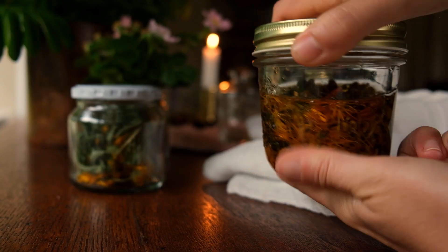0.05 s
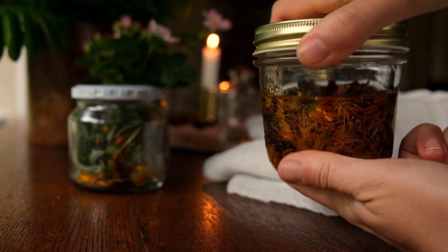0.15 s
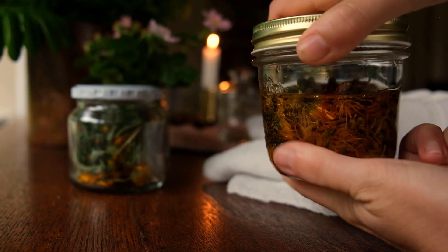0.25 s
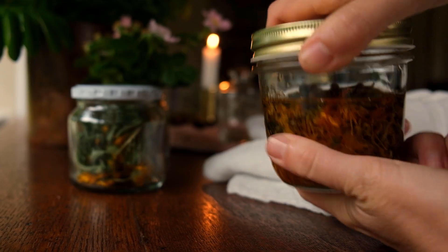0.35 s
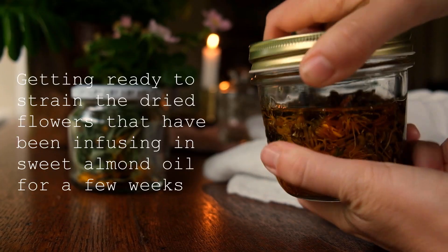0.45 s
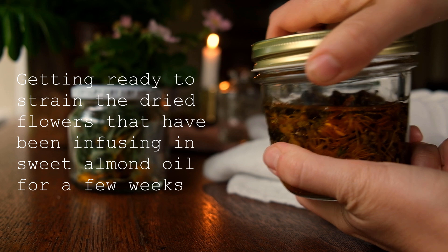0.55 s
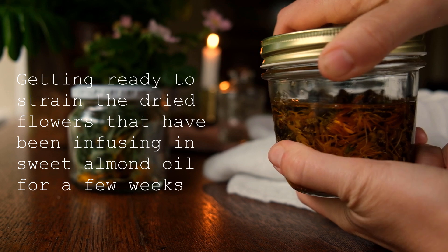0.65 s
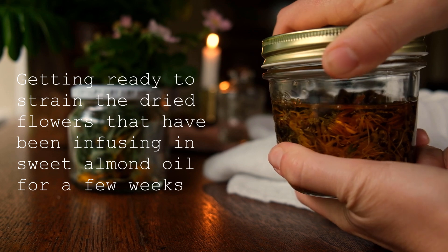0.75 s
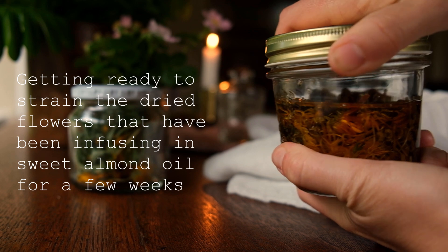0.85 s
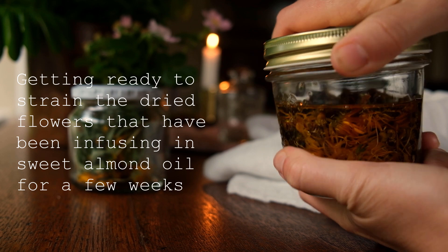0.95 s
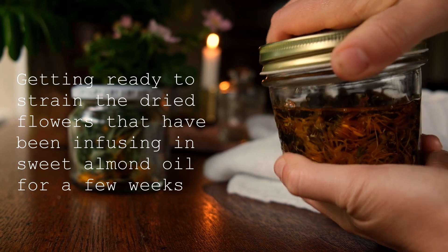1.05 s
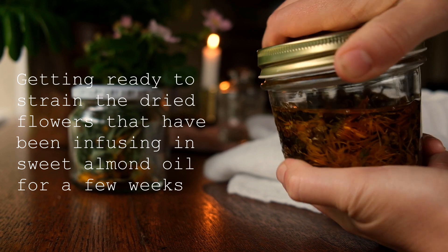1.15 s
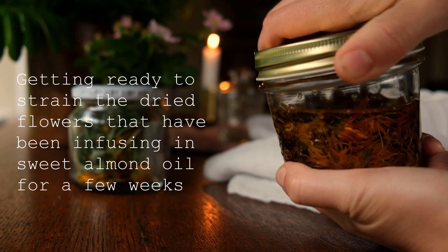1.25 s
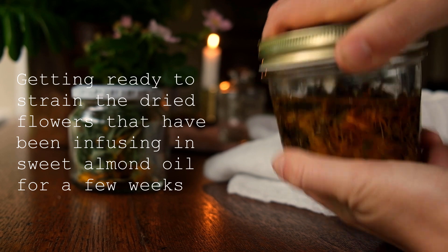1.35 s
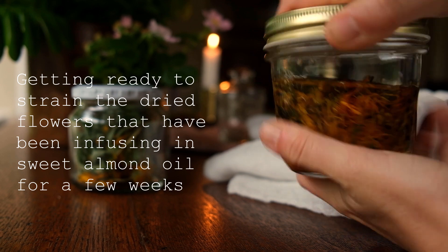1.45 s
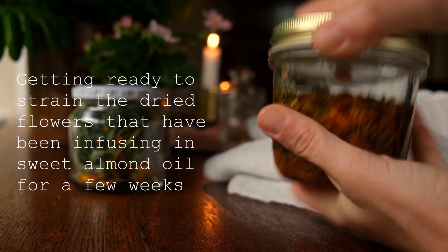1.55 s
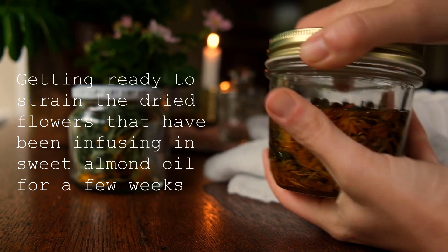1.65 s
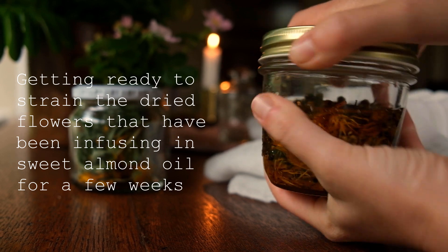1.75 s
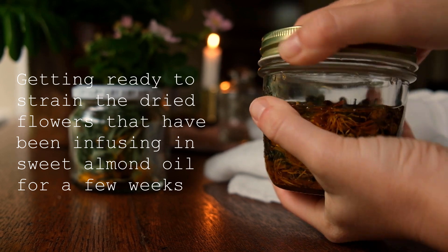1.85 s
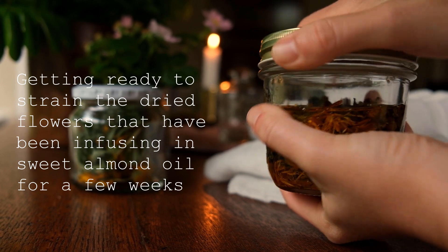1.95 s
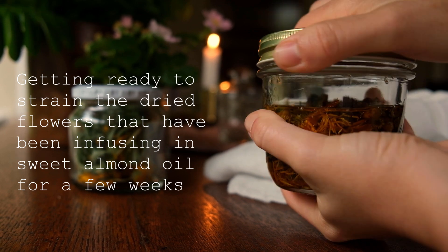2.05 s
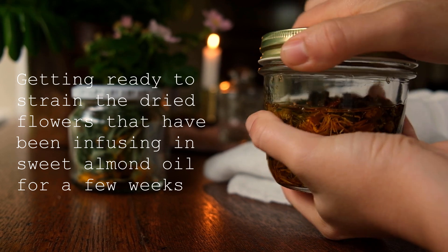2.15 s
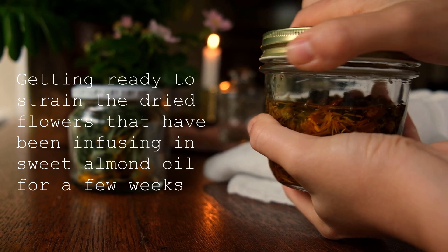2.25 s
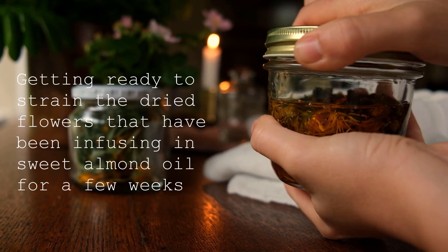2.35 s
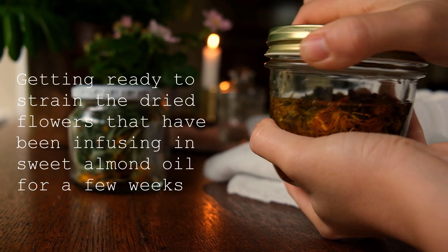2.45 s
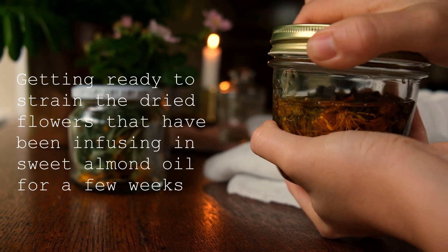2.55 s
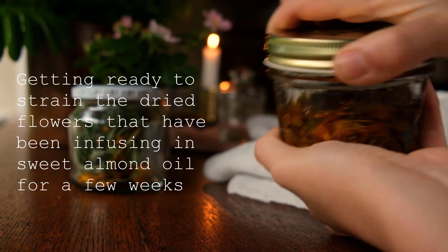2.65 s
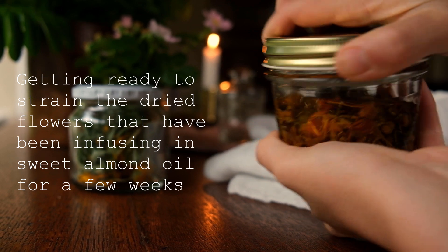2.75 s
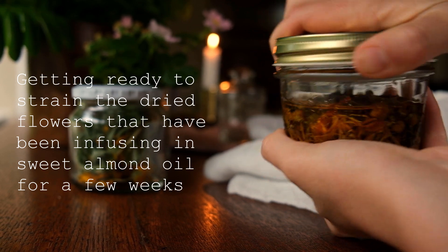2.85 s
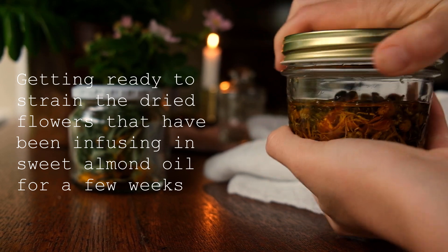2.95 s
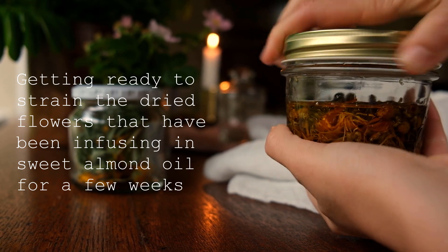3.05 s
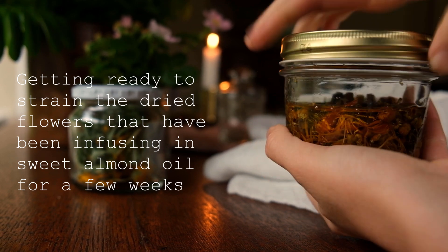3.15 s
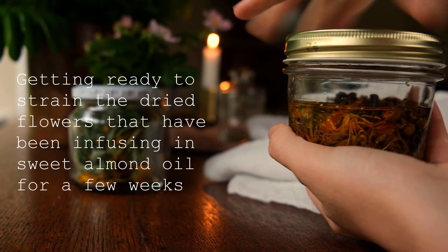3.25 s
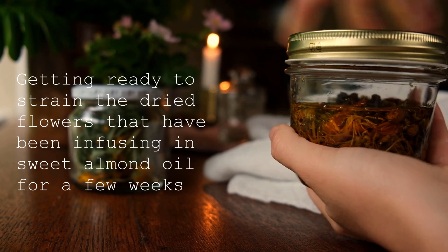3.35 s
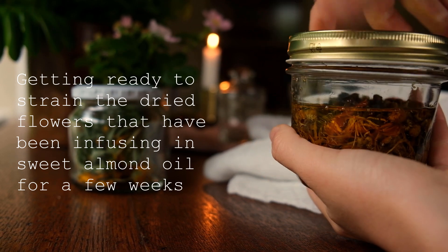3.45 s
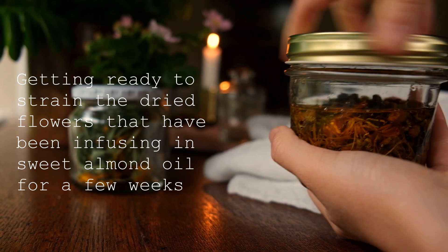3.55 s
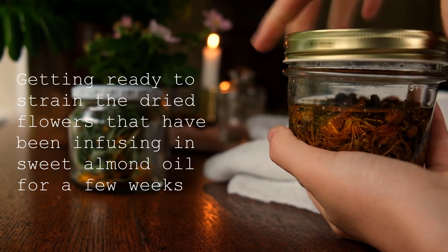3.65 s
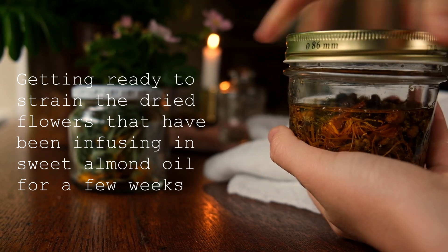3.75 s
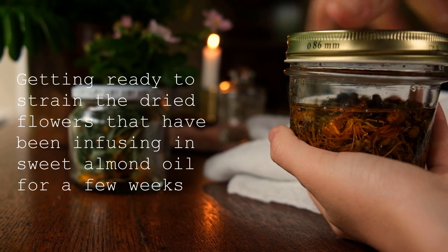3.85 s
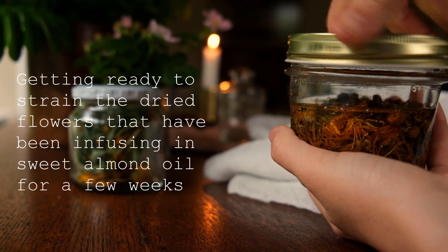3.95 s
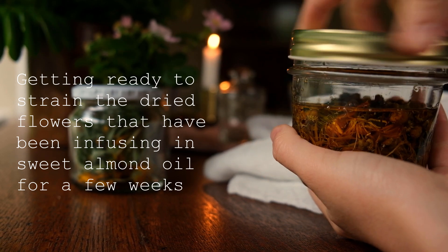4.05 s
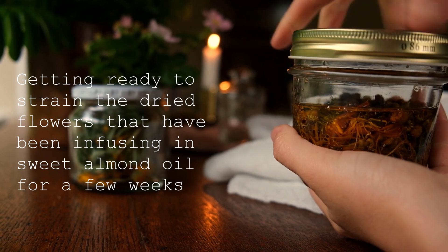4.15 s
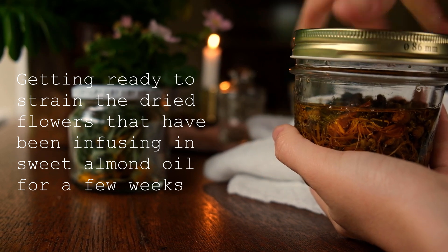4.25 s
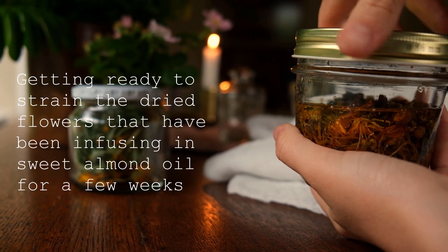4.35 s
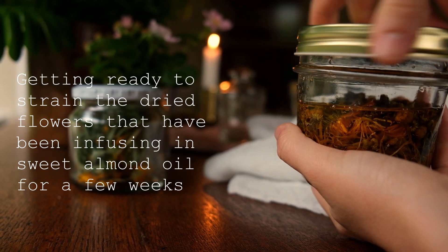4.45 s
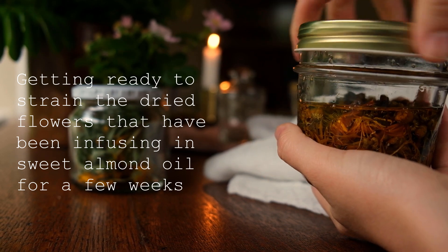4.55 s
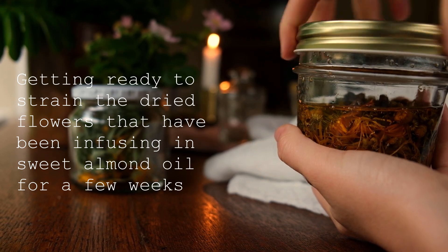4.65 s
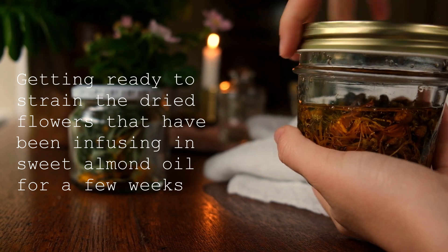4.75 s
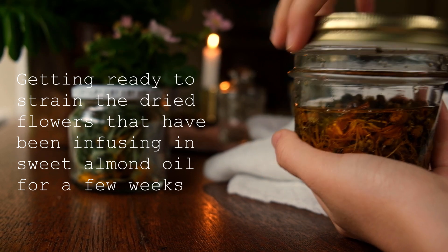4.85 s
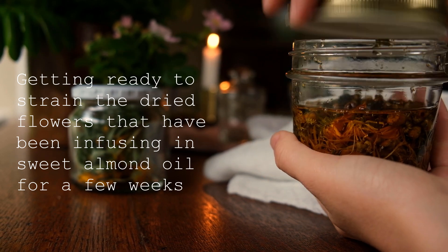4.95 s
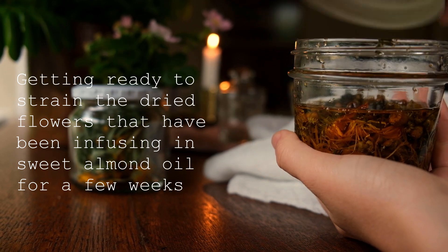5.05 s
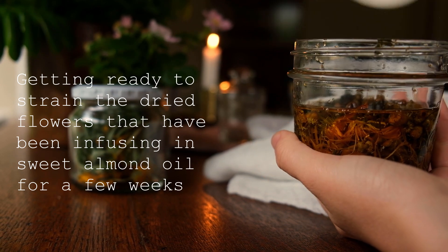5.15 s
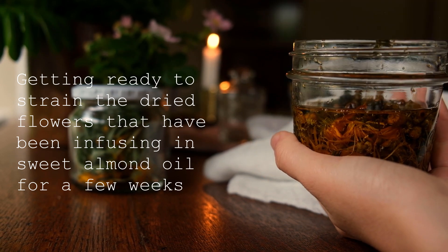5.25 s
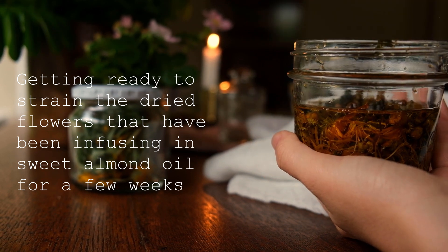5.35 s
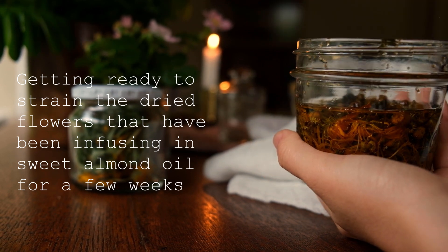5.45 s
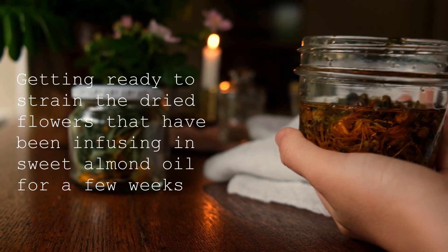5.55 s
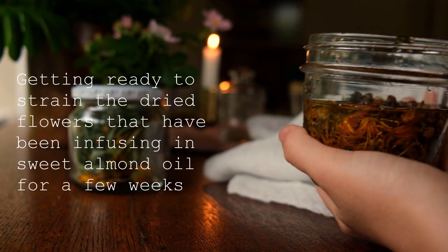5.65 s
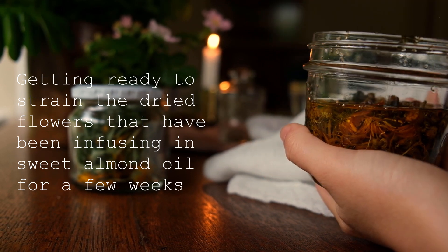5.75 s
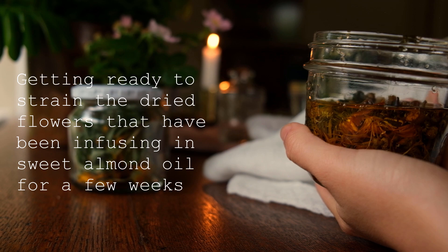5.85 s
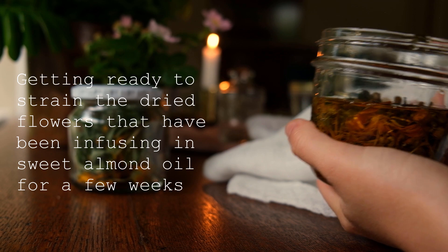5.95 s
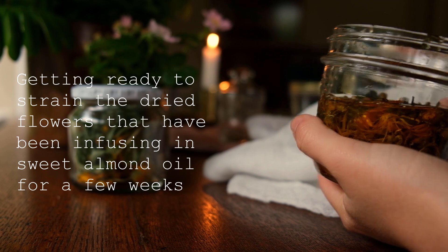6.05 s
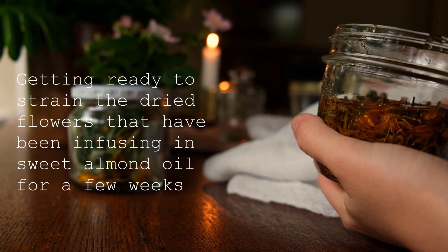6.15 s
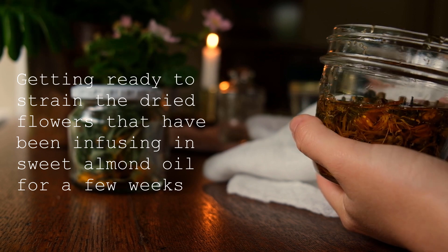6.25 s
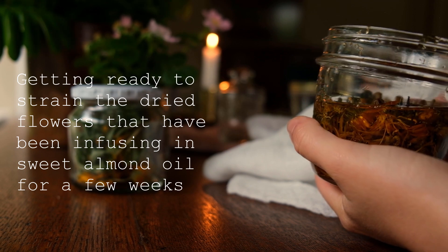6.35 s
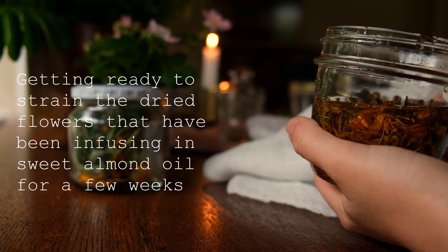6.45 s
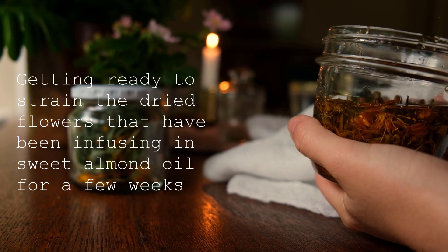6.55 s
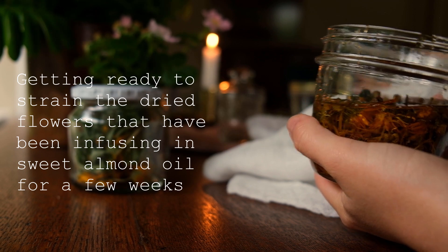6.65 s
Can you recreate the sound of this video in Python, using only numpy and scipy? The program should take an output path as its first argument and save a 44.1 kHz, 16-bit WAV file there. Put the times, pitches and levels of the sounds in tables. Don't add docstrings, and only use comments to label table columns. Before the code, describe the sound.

In a quiet room with a faint appliance hum, a soft thud is followed by low skin judder and tiny ticks as hands strain at a jar lid. The seal creaks and cracks free sharply, then short gritty metal-on-glass turns ring and click. The lid comes off with a light clink and later knocks and skids on wood. Faint birds outside; close stereo microphone.

```python
import sys
import numpy as np
from scipy import signal
from scipy.fft import rfft, irfft, next_fast_len
from scipy.io import wavfile
from scipy.ndimage import uniform_filter1d

SR = 44100
rng = np.random.default_rng(int(sys.argv[2]) if len(sys.argv) > 2 else 0)


def wav_out(sig):
    wavfile.write(sys.argv[1], SR, np.round(np.clip(np.atleast_2d(sig).T, -1, 1) * 32767).astype(np.int16))


def gain_from_db(level_db):
    decades = np.asarray(level_db, float) / 20
    return 10 ** decades


N = 295911


def rms_one(x):
    return x / np.sqrt(np.mean(x ** 2) + 1e-20)


def drift(rate_hz):
    r = np.exp(-80 * np.pi * rate_hz / SR)
    white = rng.standard_normal(N // 40 + 2002)
    slow = signal.lfilter([1], [1, -2 * r, r * r], white)[2000:]
    return np.interp(np.arange(N) / 40, np.arange(len(slow)), rms_one(slow))


def band(x, low_hz, high_hz, order=2):
    return signal.sosfilt(signal.butter(order, [low_hz, high_hz], "band", fs=SR, output="sos"), x)


def grains(per_s, spread_db):
    sizes = gain_from_db(spread_db * np.minimum(rng.exponential(1, N), 4))
    return rms_one(sizes * (rng.random(N) < per_s / SR))


def swells(rows, bend, slower=1):
    rows = np.array(rows)[:, :, None]
    late_ms = (np.arange(N) / SR - rows[:, 0]) * 1000
    part = np.where(late_ms < 0, -late_ms / rows[:, 2], late_ms / rows[:, 3]) / slower
    power = gain_from_db(2 * rows[:, 1] - 40 * np.minimum(part, 9) ** bend)
    total = power.sum(0)
    return np.sqrt(total), (power * rows[:, -1]).sum(0) / total


def bursts(times_s, peaks_db, lengths_ms, sharp):
    touch, rattle = np.zeros(N), np.zeros(N)
    for s, peak_db, ms in zip(times_s, peaks_db, lengths_ms):
        at = round(s * SR)
        fade = np.exp(-np.arange(2000) / (max(ms, .2) * SR / 1000))
        touch[at] += sharp * gain_from_db(peak_db)
        rattle[at:at + 2000] += gain_from_db(peak_db) * fade / np.sqrt(np.sum(fade ** 2))
    return touch, rattle


def body(modes, rub, touch, rattle, wander_db):
    hz, level_db, t60_s = np.transpose(modes)
    gain = gain_from_db(level_db)
    r = gain_from_db(-60 / (np.clip(t60_s, .005, .4) * SR))
    per_rub = gain / np.sqrt(np.sum(gain ** 2 / (2 - 2 * r ** 2)))
    per_blow = gain / np.sqrt(np.sum(gain ** 2))
    out, white = 0, rng.standard_normal(N)
    for k, w in enumerate(2 * np.pi * hz / SR):
        noise = np.roll(white, 9973 * k)
        blow = per_blow[k] * (touch + rattle * noise)
        rubbing = per_rub[k] * rub * gain_from_db(wander_db * drift(9.0)) * noise
        ring = [1, -2 * r[k] * np.cos(w), r[k] ** 2]
        out = out + (-1) ** k * signal.lfilter([0, np.sin(w)], ring, blow + rubbing + 1e-18)
    return out


def moving_band(hz, width_hz, force):
    pair = rng.standard_normal(N) + 1j * rng.standard_normal(N)
    r = np.exp(-np.pi * width_hz / SR)
    slow = signal.lfilter([np.sqrt(1 - r * r)], [1, -r], force * pair)
    return np.real(slow * np.exp(2j * np.pi * np.cumsum(hz * np.ones(N)) / SR))


def coloured(spectrum, alike_at, patchy_db):
    spectrum, alike_at = np.array(spectrum), np.array(alike_at)
    edges_hz = 20 * 2 ** np.arange(0, 10.1, .5)
    white = rng.standard_normal((2, 2, N))
    out = 0
    for k, (low, high) in enumerate(zip(edges_hz, edges_hz[1:])):
        mid, side = band(white[k % 2], low, high)
        centre = np.log(low * high) / 2
        level_db = np.interp(centre, np.log(spectrum[:, 0]), spectrum[:, 1])
        alike = np.clip(np.interp(centre, np.log(alike_at[:, 0]), alike_at[:, 1]), 0, 1)
        pair = np.sqrt(1 + alike) * mid + np.sqrt(1 - alike) * side * [[1], [-1]]
        out = out + gain_from_db(level_db + patchy_db * drift(3.1)) * pair
    return rms_one(out)


BAND_EDGES_HZ = (250, 1300, 3500, 15500)


def contact(modes, events, rubs, ring_db, crack_db, tail, speed_db=0):
    hiss_db, hiss_tilt_db = (-18, -7, 4), (-10, -1.7, -3.7)
    crack_tilt_db = (1.5, -0.8, 1.1)
    s, peak_db, click_low_db, click_high_db, ms = np.transpose(events)
    out = 0
    for k, click_rel_db in enumerate((click_low_db, 0, click_high_db)):
        low, high = BAND_EDGES_HZ[k:k + 2]
        touch, rattle = bursts(s, peak_db + click_rel_db, ms, sharp=0.8)
        inside = [m for m in modes if (low if k else 0) <= m[0] < high]
        out = out + gain_from_db(ring_db[k]) * body(inside, rubs[k], touch, 0.42 * rattle, wander_db=3.5)
        white = rng.standard_normal(N)
        dying = bursts(s, peak_db + click_rel_db, ms * tail, sharp=0)[1]
        crack = gain_from_db(crack_db[k]) * (dying * white + 0.53 * touch)
        tilt_db = hiss_tilt_db[k] + (k == 2) * speed_db
        edges = np.geomspace(low, high, num=5)
        for j in range(4):
            share = np.sqrt(SR / 8 / (edges[j + 1] - edges[j]))
            hiss = gain_from_db(hiss_db[k] + tilt_db * j + 3.55 * drift(44.0)) * rubs[k] * white
            noise = hiss + gain_from_db(crack_tilt_db[k] * j) * crack
            out = out + share * band(noise, edges[j], edges[j + 1])
    return band(out, 116, 14500)


# frequency in Hz, level in dB per Hz.
HUM = [(12, -50), (20, -3), (60, -2), (177, -7.5), (388, -11), (513, -6.5), (574, -23.5), (849, -6),
       (1030, -15.5), (3250, -21), (16000, -34)]
# centre in Hz, width in Hz, level in dB, patchiness in dB.
HUM_BANDS = [(429, 35, -14.5, 4), (820, 54, -12, -3.5), (1996, 390, -6, -3), (2610, 100, -22.5, 1.5),
             (4140, 450, -19.5, 0)]
# frequency in Hz, left-right likeness (used from 0, unrelated, to 1, alike
LIKENESS = [(60, -0.83), (180, 0.042), (550, 0.91), (1650, -0.017), (4970, -0.5), (15000, -0.3)]


def hum():
    out = coloured(HUM, LIKENESS, patchy_db=-0.54)
    for hz, width_hz, db, patchy_db in HUM_BANDS:
        shared = moving_band(hz, width_hz, 0.7)
        swell = gain_from_db(db + np.clip(patchy_db, 0, 3) * drift(2.9))
        sides = [shared + 1.59 * moving_band(hz, width_hz, 0.99) for _ in range(2)]
        out = out + swell * np.array(sides)
    return gain_from_db(-68) * out


# time in s, pitch in Hz, glide in Hz per s, level in dB, length in ms.
WHISTLES = [
    (1.46, 3440, 499, -78, 140),
    (1.74, 4080, 299.5, -77.5, 85),
    (2.03, 4500, -300, -78, 80),
    (5.17, 2620, 2000, -73, 43),
    (5.26, 3100, 2800, -72, 70),
    (5.37, 3300, -1500, -78, 82),
]
# time in s, pitch in Hz, glide in Hz per s, level in dB, length in ms.
COOS = [(3.85, 430, 700.5, -65.5, 65), (3.84, 830, 0, -67, 70), (4.22, 780, -100, -67, 56),
        (5.3, 400, 500, -68, 44), (1.91, 870, -300, -69.5, 22), (2.09, 375, 153.5, -68.5, 42),
        (5.22, 870, -500, -63.5, 34), (5.46, 820, -2, -69, 55), (5.51, 400, 897, -60, 17),
        (5.6, 455, 2.5, -71, 52), (5.73, 410, 448.5, -63, 51), (5.78, 885, -5, -69.5, 51)]


def bird():
    t = np.arange(N) / SR
    out = np.zeros(N)
    for calls, width_hz in ((WHISTLES, 30), (COOS, 8.9)):
        for s, hz, glide, db, ms in calls:
            swell = gain_from_db(db) * np.exp(-((t - s) * 1000 / ms) ** 2)
            out += moving_band(hz + glide * (t - s), width_hz, swell)
    return out


# time in s, middle band peak in dB, low and high band in dB above it, rattle in ms.
BUMP = [
    (0.0956, -43, 18.5, -30, 4),
    (0.1138, -58, 19, -25, 25),
    (0.15, -68, 22, -25, 30),
]
# frequency in Hz, level in dB, T60 in s.
TABLE = [(144.4, -4.5, 0.23), (340, -2, 0.13), (503, 2, 0.11), (596, 2, 0.11), (760, -2.5, 0.07),
         (870, 2, 0.045), (1070, -4, 0.05), (1430, 3, 0.031), (1870, 6, 0.028), (4200, -10, .01)]


def bump():
    out = contact(TABLE, BUMP, [0, 0, 0], ring_db=(-7, -3, -9), crack_db=(8, 7, 6), tail=1.24)
    return band(out, 60, 1500) * gain_from_db(1.5)


# time of top in s, level in dB, rise in ms, fall in ms.
SLIDE = [
    (6.1, -70, 230, 750),
    (6.278, -46, 3, 30),
    (6.312, -35, 16, 29),
    (6.34, -47, 25, 95),
]
# frequency in Hz, level in dB per Hz.
SLIDE_COLOUR = [(180, -46), (300, -20), (432, -16), (643, -11), (1060, -7), (1250, -5.5), (1830, 3),
                (5560, -9), (15800, -22)]


def slide():
    friction = 1 + .25 * grains(6000, 1.5)
    skid = friction * coloured(SLIDE_COLOUR, [(100, 1), (200, 0.96)], patchy_db=1.5)[0]
    return swells(SLIDE, bend=0.79)[0] * band(skid, 250, 11300)


# time in s, middle band peak in dB, low and high band in dB above it, rattle in ms.
LAID_DOWN = [
    (6.2765, -39, 11, -21, 14),
    (6.298, -25.5, -15, -9.5, 3.9),
    (6.309, -23.5, -7, -13, 5.3),
    (6.378, -52, -31, -10, 2.1),
    (6.43, -55, 9.5, -13, 8.3),
    (6.4484, -58, 19, -17, 2.2),
]
# frequency in Hz, level in dB, T60 in s.
LID_ON_WOOD = [(330, 2, 0.014), (706, 9, 0.007), (1102, -3, 0.066), (1410, 5.5, 0.013), (1940, -6, 0.05),
               (2000, 4, 0.026), (2600, 6, 0.026), (3040, -10, 0.021), (3570, -5, 0.032), (4230, -10, .02),
               (5200, 4, 0.037), (6980, 3, 0.022)]


def laid_down():
    knocks = contact(LID_ON_WOOD, LAID_DOWN, [0, 0, 0], ring_db=(-3, -3, -6), crack_db=(6, 9, 12), tail=0.76)
    return knocks + slide()


# time of top in s, judder in dB, rise in ms, fall in ms, lid ring in dB above it.
GRIP = [(.575, -61.5, 40, 150, -8), (.79, -62.5, 320, 340, -1.5), (1.04, -60.5, 440, 150, 2.5),
        (1.17, -57, 130, 108, -2), (1.61, -66.5, 95, 56, 2), (2.08, -68.5, 76, 200, -2),
        (2.25, -59.5, 220, 120, -1.5), (2.42, -60.5, 240, 130, -5.5), (2.6, -49, 130, 145, -12),
        (2.8, -53.5, 220, 290, -2), (2.96, -56, 360, 250, 0.5), (3.25, -74, 150, 320, 14),
        (6.12, -76, 160, 800, 12), (6.275, -62, 25, 75, 5), (6.388, -63.5, 61, 57, 2)]
# frequency in Hz, level in dB, T60 in s.
JUDDER = [(62, -11, 0.087), (93, -5.5, 0.18), (146.3, 5.5, 0.13), (181.6, -4.5, 0.067)]
# frequency in Hz, level in dB, T60 in s.
HELD_LID = [(265, -2, .05), (370, -4, .05), (500, -1, .07), (720, -3, .06), (1070, -11, .05)]
# time in s, peak in dB.
JOLTS = [(0.103, -44), (0.565, -44), (0.615, -51), (0.711, -63), (0.761, -43), (0.818, -47), (0.894, -43.5),
         (0.973, -55), (1.028, -46.5), (1.062, -46), (1.112, -46), (1.14, -52), (1.169, -47), (3.51, -47.5)]
# time in s, peak in dB.
LATE_JOLTS = [(2.154, -60), (2.204, -54), (2.274, -55), (2.32, -56), (2.349, -57), (2.404, -50),
              (2.495, -54), (2.549, -48), (2.598, -36.5), (2.639, -46), (2.689, -54), (2.779, -51),
              (2.809, -52), (2.887, -51), (2.944, -48), (3.029, -54), (3.069, -55), (6.204, -64),
              (6.272, -52), (6.374, -56), (6.425, -59)]
# time of top in s, level in dB, rise in ms, fall in ms, slips per s.
CREAK = [
    (2.425, -51, 29.6, 58, 406),
    (2.48, -48, 22.6, 42, 420),
    (2.544, -48, 26, 15, 515),
]


def grip():
    strain, ring_rel_db = swells(GRIP, bend=1.7)
    lumps = strain * gain_from_db(2.0 * drift(22))
    jolt_s, jolt_db = np.transpose([*JOLTS, *LATE_JOLTS])
    jolts = bursts(jolt_s, jolt_db + 0.8, jolt_s, sharp=0.85)[0]
    push = uniform_filter1d(uniform_filter1d(jolts, size=60), size=60)
    out = body(JUDDER, lumps * gain_from_db(-4.5), push, 0, wander_db=4.5)
    out += body(HELD_LID, lumps * grains(700, 3.3) * gain_from_db(ring_rel_db - 6), 0, 0, wander_db=2.0)
    rustle = lumps * grains(1000, 3.2) * rng.standard_normal(N)
    out += band(rustle * gain_from_db(ring_rel_db + 4), 200, 880)
    squeeze, slips_hz = swells(CREAK, bend=2.3)
    phase = np.cumsum(slips_hz * (1 + 0.07 * drift(150))) / SR
    slips = np.diff(np.floor(phase), prepend=0)
    creak = rms_one(band(slips * gain_from_db(3.5 * rng.standard_normal(N)), 260, 880))
    return band(out, 41, 3000) + squeeze * creak


# time in s, pitch in Hz, peak in dB, length in ms.
BLIPS = [(2.601, 1037, -24.5, 2.8), (3.502, 330, -42.5, 1.7), (3.5104, 520, -33, 0.79),
         (4.473, 559, -19.5, 1.26), (4.847, 445, -34.5, 6), (4.878, 2050, -46, 4.5),
         (4.884, 2250, -49, 3.5), (4.892, 2000, -47, 3.2), (3.545, 3750, -49, 8), (3.541, 6900, -53, 5),
         (3.61, 3850, -44, 10), (3.603, 5300, -46, 5), (4.03, 5930, -45, 8), (4.062, 4400, -43, 7),
         (4.025, 3900, -47, 12), (4.125, 830, -46, 12), (4.125, 1700, -49, 12), (3.665, 2460, -50, 10),
         (4.66, 2500, -49, 14), (4.86, 2460, -54, 25), (4.887, 3600, -50, 7), (4.893, 720, -39, 3.5),
         (4.902, 800, -45, 5.5), (4.912, 852, -30.5, 2.7), (2.3, 1060, -54.5, 12.3), (2.31, 380, -55, 26),
         (3.09, 1040, -50.5, 24), (3.015, 1050, -59, 23), (0.768, 510, -63, 30), (1.04, 510, -60.5, 33),
         (0.96, 1070, -67, 35), (1.04, 720, -63, 30), (6.5, 400, -60.5, 18)]
# time in s, pitch in Hz, peak in dB, length in ms.
CATCHES = [(3.584, 270, -46, 4.0), (3.603, 512, -41.0, 5.0), (3.622, 317, -37.5, 4.7),
           (3.631, 532, -34.5, 3.7), (3.647, 280, -47.0, 5.0), (3.649, 581, -45, 5.5),
           (3.672, 585, -48.0, 3.0), (3.675, 322, -41.5, 4.2), (3.694, 392, -46.5, 6.0),
           (3.977, 285, -45.5, 7.0), (3.986, 586, -48.0, 4.6), (4.017, 355, -50, 27.0),
           (4.031, 343.5, -43.5, 6.2), (4.062, 300.9, -35.5, 5.2), (4.079, 290, -48.5, 42),
           (4.146, 317, -55, 24), (4.385, 339, -51, 7.0), (4.398, 425, -52.5, 18), (4.432, 376, -46, 4.4),
           (4.487, 641, -36.5, 15), (4.507, 274, -45.0, 5.0), (4.518, 506, -46, 4.6),
           (4.632, 714, -44.0, 4.0), (4.657, 683, -41, 17), (4.677, 672, -42, 20), (4.691, 625, -45, 14),
           (4.692, 441, -44, 11), (4.712, 520, -43, 3.4), (4.744, 565, -43.5, 15), (4.756, 609, -41, 5.0),
           (4.794, 635, -40, 3.0), (4.808, 608, -40, 3.0), (4.819, 629, -37, 2.4)]
# time in s, pitch in Hz, peak in dB, length in ms.
SINGS = [(3.543, 2300, -46, 8.0), (3.5665, 2487, -37, 3.5), (3.557, 2150, -45, 3),
         (3.606, 2440, -43.5, 12.0), (3.608, 774, -45, 9.0), (3.611, 1247, -43.0, 10),
         (3.611, 2900, -45.0, 15), (3.632, 807, -39.0, 16.0), (3.641, 1084, -43, 14),
         (4.007, 796, -43, 4.0), (4.015, 2438, -38, 6.0), (4.019, 1415, -42, 4.0), (4.025, 1092, -45, 41),
         (4.051, 780, -44.5, 8.4), (4.055, 1073, -38.5, 7.2), (4.07, 2444, -48, 21.0),
         (4.074, 1916, -40, 4.0), (4.083, 1687, -45.0, 18), (4.095, 2473, -47.5, 23.0),
         (4.412, 1720, -53, 5.4), (4.418, 1069, -53, 14.0), (4.419, 784, -51, 17.0),
         (4.516, 1630, -49.0, 7.0), (4.52, 2440, -40.5, 9.6), (4.521, 1073, -39.5, 13),
         (4.535, 839, -42, 20), (4.55, 1733, -48.5, 15), (4.58, 1098, -43.0, 7.4), (4.631, 1458, -48.0, 14),
         (4.662, 1001, -50.0, 7.0), (4.731, 803, -47, 12.0), (4.763, 2530, -48, 4.3),
         (4.772, 1060, -45, 15), (4.789, 2535, -50.0, 5.0), (4.805, 1055, -45.0, 9.0),
         (4.832, 850, -41, 3.5), (4.915, 1040, -34.0, 4.0), (4.915, 2850, -41.0, 5.0),
         (4.919, 847, -30, 5.3), (4.92, 2450, -41.0, 10.5)]


def blips():
    out = np.zeros(N)
    for s, hz, db, ms in [*BLIPS, *CATCHES, *SINGS]:
        at = round(s * SR) + np.arange(-6000, 6000)
        late = (at / SR - s) * 1000 / max(ms, .3)
        swell = np.exp(-(late * np.where(late < 0, 1.15, .9)) ** 2)
        out[at] += gain_from_db(db) * swell * np.sin(2 * np.pi * hz * at / SR)
    return out


# time of top in s, level in dB, rise in ms, fall in ms, hand weight as low band dB.
TURNS = [(2.28, -56, 10, 36, 4.5), (2.598, -36, 2.7, 39, -4.5), (2.66, -58, 48, 116, -2),
         (3.02, -64, 82, 110, 6), (3.09, -47.5, 40, 59, 0), (3.54, -45.5, 10, 55, -12),
         (3.578, -48, 12, 40, -3), (3.605, -43, 56, 78, 4.5), (3.65, -50.5, 120, 27, 11.5),
         (4.012, -39.5, 44, 77, -4.5), (4.06, -38, 42, 30, -3.5), (4.105, -41.5, 110, 40, -10),
         (4.34, -75, 6, 127, 20), (4.408, -55.5, 33, 64, 5.5), (4.474, -49.5, 5.4, 82, 13.5),
         (4.519, -44.5, 9, 80, 7), (4.645, -46, 180, 150, 1), (4.775, -47.5, 104, 81, 4.5),
         (4.84, -52, 86, 40, 7), (4.882, -44.5, 25, 29, -8), (4.918, -57, 8, 50, 4)]
# time in s, level in dB, length in ms.
SPURTS = [
    (2.28, 12, 15),
    (4.525, 3, 27),
    (4.63, 3, 15),
    (4.76, 6, 20),
    (2.606, 10, 9),
    (3.546, 5, 9),
    (3.605, 15.5, 24),
    (4.05, 11, 45),
    (4.12, -20, 22),
]
# time in s, peak in dB, low band in dB above it, high band in dB above it.
CLICKS = [(2.1698, -44, 0.5, -2), (2.179, -51, -3, -5), (2.271, -46.5, -28, 6), (2.279, -41.5, -15, 3.5),
          (2.5945, -12.5, -9, -3.5), (2.596, -41, -8, -11), (2.6114, -29.5, -22, 1), (2.7405, -49, 2, -9),
          (3.138, -57, -16, 4), (3.5357, -38, -2, -4), (3.5639, -29, -6, -10), (3.5965, -38, -19, 4),
          (3.6075, -36, -15, 4), (3.976, -42, 7, -6), (4.0104, -30, -27, -17), (4.4703, -33, 4.5, -15),
          (4.5153, -28, -8, -16), (4.5347, -47, -3, -19), (4.9098, -31, -2.5, 8), (4.9146, -33, -2, 2),
          (4.9172, -38, 8, -23)]
# time in s, peak in dB.
TICKS = [(0.7096, -56.5), (0.7896, -54.5), (0.8641, -51), (0.9488, -53), (1.0172, -53), (1.045, -50.5),
         (1.1343, -56), (1.1898, -54), (1.81, -55), (2.133, -52.5), (2.218, -49), (0.936, -57),
         (1.152, -57), (5.9311, -54)]
# frequency in Hz, level in dB, T60 in s.
LID = [(311, -6, 0.05), (472, 8, 0.02), (690, 9, 0.015), (795, 5, 0.064), (1060, 7.5, 0.045),
       (1085, -10, 0.09), (1295.4, -1, 0.0063), (1719, 4.5, 0.031), (1980, 0, 0.031), (2223, 2.5, 0.026),
       (2494, -7, 0.034), (2469, 7.5, 0.029), (2662, -6, 0.074), (2823, -0.5, 0.065), (3450, -6, 0.013),
       (3794, -9, 0.027), (4300, -30, 0.017), (4470, -13.5, 0.03), (4954, -11.5, 0.047), (5370, -5, 0.015),
       (6110, -5.5, 0.0088), (6260, -13, 0.013), (6730, -13, 0.021), (7560, -11, 0.015)]
# time in s, resonance in Hz.
GAP = [(2.3, 550), (3.6, 520.7), (3.65, 590), (3.99, 500), (4.04, 320), (4.14, 300), (4.35, 350),
       (4.55, 713.8), (4.78, 622), (4.85, 451), (4.91, 817)]


def lid():
    t = np.arange(N) / SR
    mid = swells(TURNS, bend=1.73)[0]
    low, weight_db = swells(TURNS, bend=1.21, slower=1.34)
    high_rel_db = -13.5 + sum(db * np.exp(-((t - s) * 1000 / ms) ** 2) for s, db, ms in SPURTS)
    press = gain_from_db(-4.5 + 0.45 * drift(35))
    grit = press * (grains(2500, 3.3) + .5)
    fine = press * (grains(6000, 3.8) + 1.26)
    rubs = [low * grit * gain_from_db(weight_db), mid * grit, mid * fine * gain_from_db(high_rel_db)]
    speed_db = 0.55 * np.clip(20 * np.log10(mid) + high_rel_db + 54, -25, 3.0)
    ticks = [(s, db, -1.5, 0) for s, db in TICKS]
    blows = [(*row, 1.76) for row in [*CLICKS, *ticks]]
    out = contact(LID, blows, rubs, ring_db=(-3, -3, -5), crack_db=(3, 9, 12), tail=3.05, speed_db=speed_db)
    gap_hz = np.interp(t, *np.transpose(GAP))
    ridge_hz = 4250 * (1 + .06 * drift(4.8))
    out = out + moving_band(gap_hz, 160, rubs[0] * gain_from_db(-5.5))
    out = out + band(moving_band(ridge_hz, 900, rubs[2] * gain_from_db(-6.0)), 4200, 13500)
    knocks = band(grains(90, 5.3) * rng.choice([-1, 1], N), 205, 440)
    out = out - .3 * signal.lfilter(*signal.iirpeak(1400, 6.5, fs=SR), out)
    return band(out, 197, 14000, order=3) + gain_from_db(3.5) * low * knocks


# frequency in Hz, left port lead in radians.
PORT_PHASE = [(300, -.12), (1000, -.7), (2500, -1.), (4500, -1.13), (8000, -2.), (14000, -2.2)]
# frequency in Hz, left port lead in radians.
PORT_PHASE_TABLE = [(200, -.15), (1000, -0.42), (2300, -1.94), (4300, -1.98), (14000, -1.5)]


def at_ports(x, pan_db, phase):
    hz, lead = np.transpose(phase)
    log_hz = np.log(np.fft.rfftfreq(N, 1 / SR) + 1)
    turn = np.interp(log_hz, np.log(hz), np.unwrap(lead)) / 2
    pan = gain_from_db(np.array([[pan_db / 2], [-pan_db / 2]]))
    return irfft(rfft(x) * np.exp(1j * turn * [[1], [-1]]), N) * pan


def room(x):
    t60_s, wall_cut_hz = 0.23, 13700
    size = next_fast_len(N + SR)
    x = band(x, 350, 17000, order=1)
    turn = np.exp(-2j * np.pi * np.fft.rfftfreq(size))
    dull = np.exp(-2 * np.pi * wall_cut_hz / SR)
    wall = (1 - dull) / (1 - dull * turn)
    lags = (rng.uniform(.007, .03, 16) * SR).astype(int)
    loops = [gain_from_db(-60 * lag / SR / t60_s) * wall * turn ** lag for lag in lags]
    sides = [sum((-1) ** k * g / (1 - g) for k, g in enumerate(loops[ear::2])) for ear in range(2)]
    return irfft(rfft(x, size) * np.array(sides), size)[:, :N]


def scene():
    jar = lid() + blips() + grip()
    thud, laid = bump(), laid_down()
    direct = at_ports(jar + bird(), -0.94, PORT_PHASE)
    direct = direct + at_ports(thud, .4, PORT_PHASE_TABLE) + at_ports(laid, 1.1, PORT_PHASE_TABLE)
    around = gain_from_db(-22.5) * room(jar + gain_from_db(8.0) * thud + gain_from_db(6.5) * laid) + hum()
    sway = gain_from_db(-13) * drift(40) * [[1], [-1]]
    return direct + sway * band(direct, 1300, 16000, order=1) + around


def band_limit(x):
    return signal.sosfilt(signal.butter(12, 15850, fs=SR, output="sos"), x)


def record(dry):
    return band_limit(dry)


dry = scene()
out = record(dry)
wav_out(out)
```